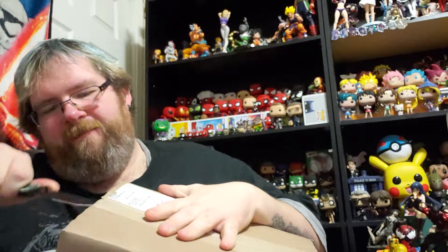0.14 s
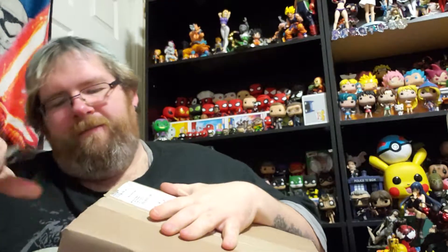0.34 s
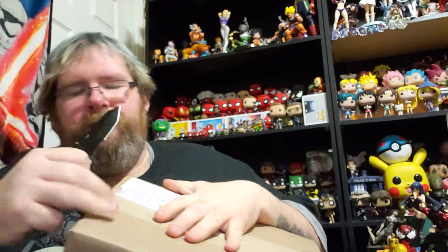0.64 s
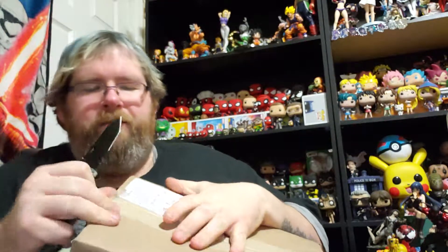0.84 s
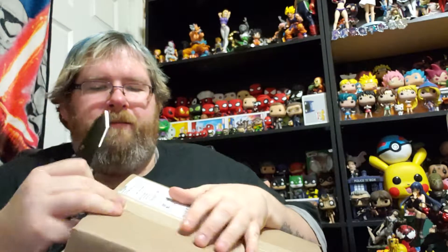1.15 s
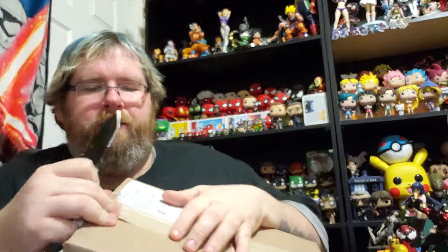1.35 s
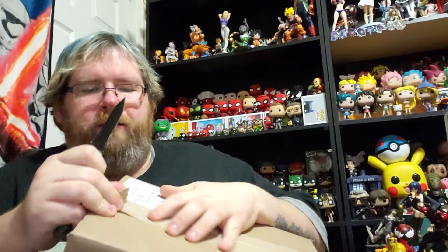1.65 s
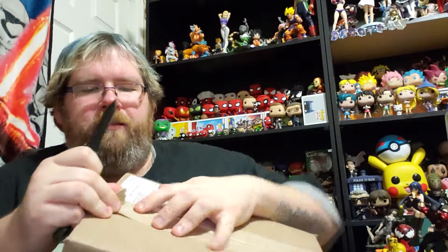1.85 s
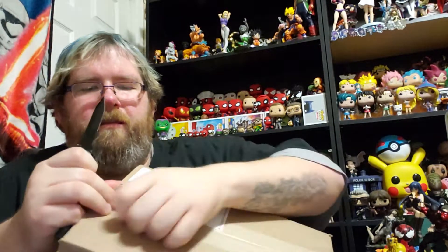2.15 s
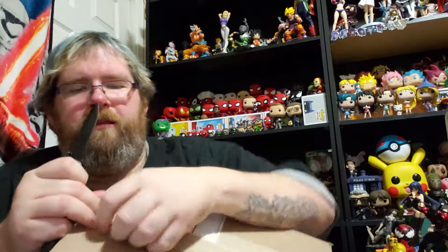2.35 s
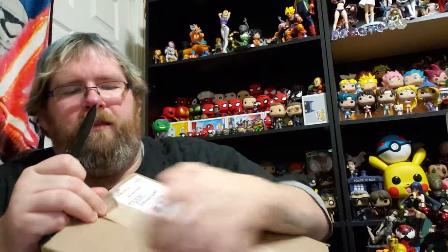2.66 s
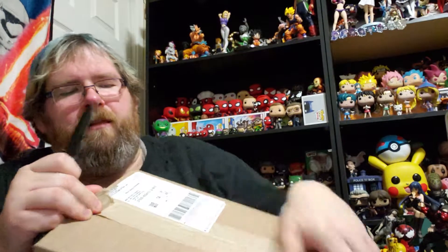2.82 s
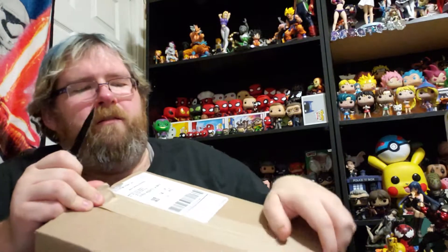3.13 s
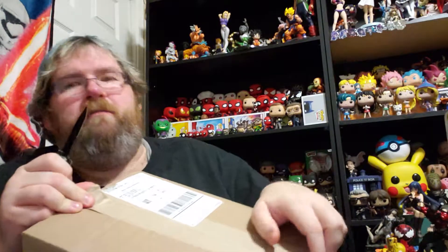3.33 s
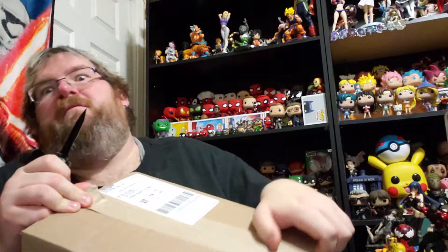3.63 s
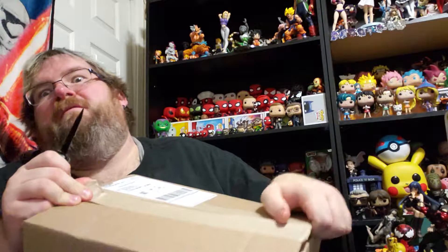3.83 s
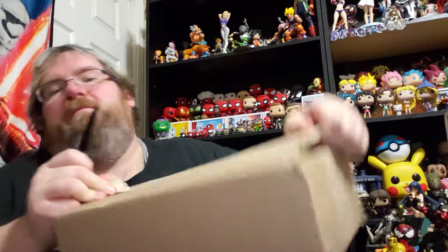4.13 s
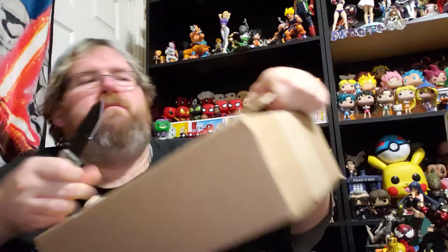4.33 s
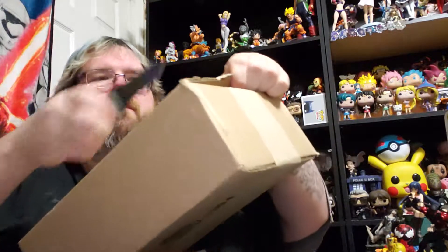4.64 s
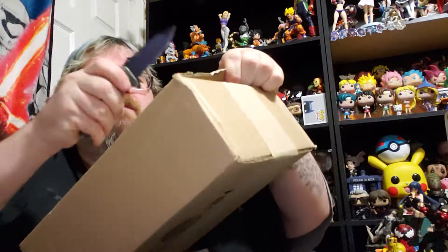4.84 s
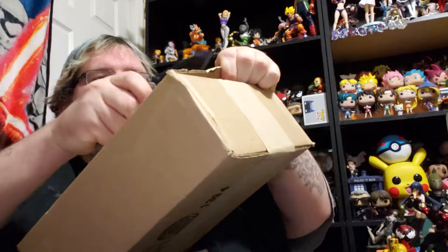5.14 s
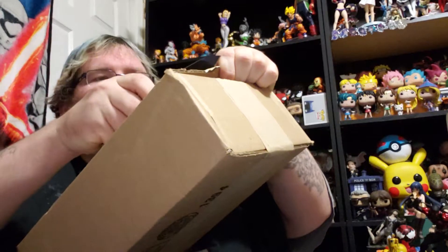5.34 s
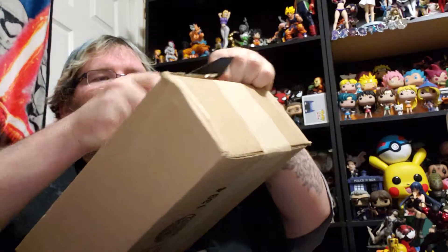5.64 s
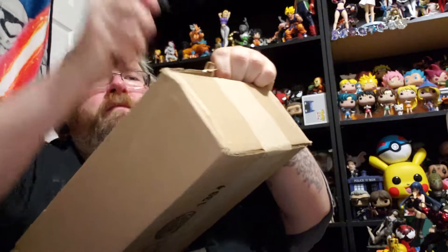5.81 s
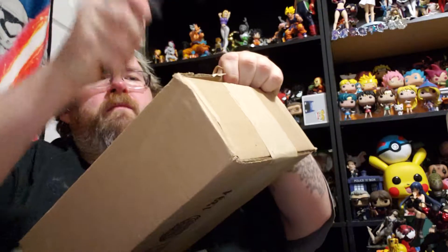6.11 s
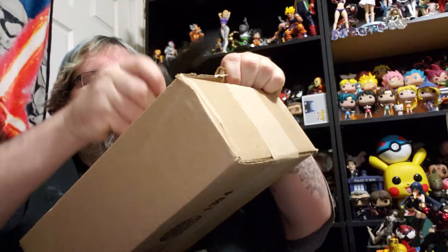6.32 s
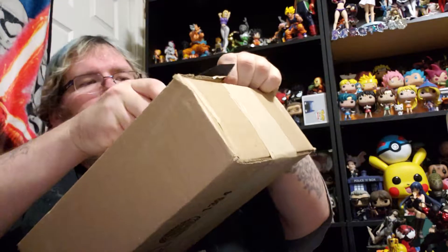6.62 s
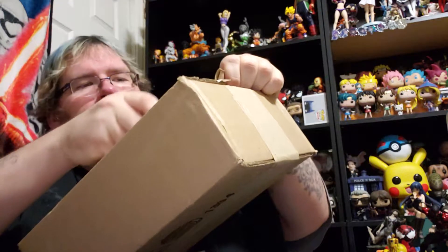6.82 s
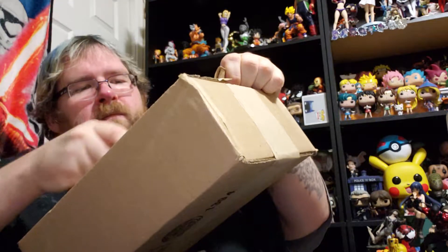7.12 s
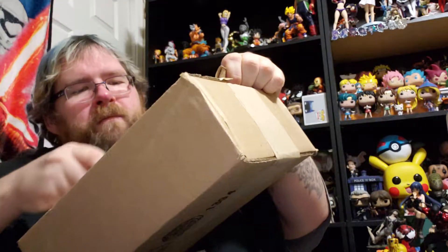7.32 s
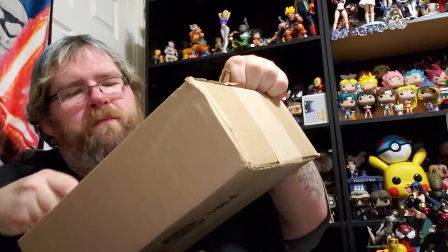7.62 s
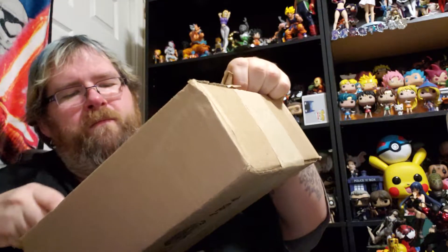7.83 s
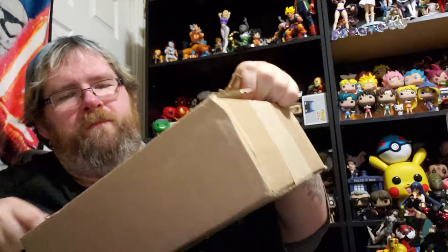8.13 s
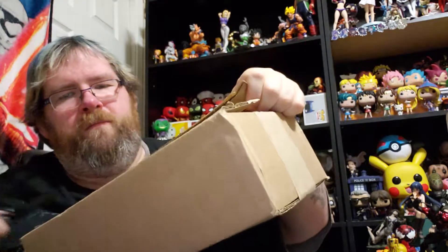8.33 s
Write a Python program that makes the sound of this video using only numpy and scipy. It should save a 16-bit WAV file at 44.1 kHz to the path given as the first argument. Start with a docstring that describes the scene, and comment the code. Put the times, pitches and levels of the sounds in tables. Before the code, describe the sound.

Close stereo microphones in a small furnished room with short dense echoes, a faint wavering low hum and soft hiss. At 0.2 s a light hollow tap on a cardboard box, then around 0.9-1.05 s a cluster of crisp knocks with papery scuffs. From 1.5 to 2.0 s small faint ticks and skin rubs. At 2.3 s duller pats, a sharper snappy knock at 2.7 s, low thumps near 3.0 s, with dry sliding rustle between and sparse ticks until 3.9 s. At 4.3-4.4 s the box is shifted with rubbing and a firm hollow thud. Near quiet follows until 5.7 s, when a loud punch pops through the tape. Quiet again, then small knocks at 6.6-6.8 s lead into a continuous gritty, rumbling blade scrape until 7.9 s. It ends with heavy boxy thumps at 7.94 and 8.09 s, then light bumps and rustle to 8.45 s.

```python
"""Hands and a knife work on a taped cardboard box, close to two microphone ports in a small furnished room.
Rubbing and slitting are stick-slip clicks and noise that shake box and panel modes; knocks ring the same
modes, and tape snaps are short noise bursts. Rasp and sizzle are friction noise of wandering colour.
Behind them: dense room echoes, a murmur, a wavering low hum and the hiss of each port."""
import sys
import numpy as np
from scipy import signal
from scipy.fft import rfft, irfft, next_fast_len
from scipy.io import wavfile

SR = 44100
rng = np.random.default_rng(int(sys.argv[2]) if len(sys.argv) > 2 else 0)


def bounce(signal):
    """Save signal as a 16-bit WAV file at the path given by the first command-line argument."""
    frames = np.transpose(np.atleast_2d(signal))
    limited = np.clip(frames, -1, 1)
    pcm = np.round(limited * 32767).astype(np.int16)
    wavfile.write(sys.argv[1], SR, pcm)


N = 373377

# All table levels are relative: the mix in scene() sets the final gains.
# knocks on the box: start_s, thump_db, thump_centre_hz, panel_db, panel_centre_hz, tape_snap_db
KNOCKS = [(0.213, -38, 250, -55, 622, -59), (0.2243, -25.5, 270, -31.5, 590, -38.5),
          (0.89, -41, 258, -37, 1900, -42), (0.9105, -26, 256.6, -24, 2010, -25.5),
          (0.935, -35, 250, -44.5, 651, -27.5), (0.985, -18.5, 581, -23, 580, -20),
          (0.997, -46, 566, -28, 590, -25), (1.048, -20, 297, -24.5, 690, -25.5),
          (1.49, -46, 245, -30.5, 1870, -28.5), (1.505, -30, 250, -36, 700, -31),
          (1.54, -42, 245, -40, 1870, -36), (1.567, -44, 468, -29, 1960, -25),
          (1.619, -34, 260, -38, 1860, -37), (1.679, -49, 382, -38, 1750, -38),
          (1.717, -40, 300, -44, 905, -45.5), (1.7495, -29, 280, -34, 645, -40),
          (1.784, -34, 280, -48, 650, -54), (1.805, -35, 280, -42, 640, -49),
          (1.909, -37, 300, -41, 653, -42.5), (1.925, -44, 400, -36, 1000, -52),
          (1.944, -32, 297, -35.5, 920, -56), (2.303, -25.5, 200, -41, 620, -58),
          (2.338, -22.5, 198, -33, 620, -44), (2.555, -26, 266.4, -52, 633, -68),
          (2.6733, -13, 271, -19, 1180, -11.5), (2.944, -18, 140, -34.5, 600, -36),
          (3.0204, -17.5, 161, -27.5, 616, -47), (3.035, -24, 174, -34, 627, -37),
          (3.103, -52, 258, -47, 767, -35), (3.469, -64, 517, -29, 1560, -27.5),
          (3.6291, -56, 598, -21.5, 786, -33), (3.719, -34.5, 240, -36, 678, -45.5),
          (3.8405, -38, 592, -32.5, 600, -30.5), (3.903, -25.5, 250, -42, 620, -62),
          (4.256, -43.5, 363, -34.5, 614, -45), (4.35, -17, 454, -25, 633, -34),
          (4.4008, -10, 227, -19.5, 617, -28), (4.537, -31.5, 220, -47.5, 620, -51),
          (4.561, -35, 202, -64.5, 620, -72), (5.323, -37.5, 180, -68, 596, -65.5),
          (5.489, -61.5, 127, -81, 708, -62), (5.587, -68.5, 131.7, -70, 593, -61),
          (5.644, -74, 201.4, -75, 595, -57.5), (5.707, 0.5, 445, -30, 600, -22),
          (5.749, -19, 248, -19.5, 850, -25.5), (6.53, -40.5, 250, -63, 617, -60),
          (6.572, -48, 366, -54, 2090, -34.5), (6.631, -28.5, 170, -58, 620, -56),
          (6.773, -22.5, 248, -30.5, 605, -34), (7.9358, 1, 297, -12, 726, -20),
          (7.9814, -36, 180, -19, 630, -15.5), (8.0862, -4.5, 494, -18, 636, -22.5),
          (8.28, -25, 261, -48, 608, -72), (8.35, -32.5, 226, -60, 600, -56),
          (8.436, -27.5, 260, -62, 607, -59)]
# rubs, grips and tears: full_strength_s, rise_s, hold_s, rumble_db, deep_over_rumble_db,
# panel_creak_db, card_rasp_db, tape_and_skin_sizzle_db
RUBS = [(0.0, 0.012, 0.0043, -45, -21, -53.5, -72, -48), (.3, 0.09, 0.0086, -53, -12, -48.5, -60, -47.5),
        (.66, 0.1, 0.14, -52.5, 4, -56.5, -60, -52.5), (.915, 0.034, 0.083, -36.5, -16, -38, -41, -38),
        (1.0, 0.024, 0.015, -50, 1, -51, -34.5, -32.5), (1.22, 0.085, 0.015, -58, 5, -51, -64, -47.5),
        (1.5, 0.15, 0.13, -50.5, -1, -60, -54, -49.5), (1.67, .05, 0.033, -65, -4, -68, -61, -45),
        (1.77, 0.18, 0.059, -48, -23, -57, -61.5, -51.5), (1.95, 0.031, 0.027, -47.5, -2, -55, -64, -67),
        (1.98, 0.082, 0.043, -89, 25, -53, -60.5, -48), (2.28, 0.36, 0.025, -47.5, 2, -44, -54.5, -42),
        (2.36, .06, 0.084, -52, -4, -32.5, -56, -46), (2.48, .025, .025, -48, -2, -38.5, -46, -34),
        (2.59, 0.038, 0.093, -37, 8.5, -42.5, -63, -50), (2.87, 0.45, 0.0051, -54.5, -3, -68, -54, -39.5),
        (2.99, 0.15, 0.031, -61.5, 6, -55, -50.5, -40.5), (3.13, 0.24, 0.019, -49, -12, -48.5, -52, -42.5),
        (3.25, 0.066, 0.03, -49, 1, -48.5, -55.5, -47.5), (3.49, 0.18, .005, -47.5, 2, -47.5, -58, -48.5),
        (3.77, 0.15, 0.0025, -45, 10, -49, -67, -57), (3.85, 0.027, 0.076, -39, -1.5, -50, -48.5, -47),
        (4.17, 0.14, 0.081, -59, 16, -50.5, -48.5, -46.5), (4.26, 0.17, 0.15, -36, -3, -48, -57.5, -58),
        (4.6, 0.036, 0.021, -55, -1, -83, -93, -75), (4.95, 0.39, 0.032, -56.5, 1.5, -87.5, -80.5, -76),
        (5.4, 0.06, 0.027, -57, -6.5, -91, -99, -85), (5.68, .06, 0.016, -67.5, -1.5, -74, -85, -59.5),
        (5.712, 0.0066, 0.016, -17.5, 5.5, -30, -28.5, -24.5),
        (5.96, 0.093, 0.021, -60.5, -5.5, -65.5, -86, -78), (6.29, 0.3, 0.031, -63.5, -6, -90, -90, -85),
        (6.57, 0.038, 0.036, -49.5, 7, -59.5, -50.5, -52.5),
        (6.62, 0.048, 0.021, -43.5, 8.5, -57, -51, -38.5),
        (8.0, .015, 0.073, -34.5, 9.5, -44, -43.5, -42.5), (8.18, 0.09, 0.022, -62, -5, -46.5, -58, -51),
        (8.29, 0.096, 0.0021, -41.5, -5, -54, -62.5, -53),
        (8.44, 0.039, 0.0044, -47.5, -8, -52.5, -83, -74)]
# long draw of the blade along the seam: time_s, rumble_db, panel_creak_db, friction_db
CUT = [(6.74, -51, -95, -69), (6.78, -33.5, -52, -40.5), (6.86, -33.5, -44.5, -44),
       (7.05, -30.5, -40, -42.5), (7.16, -34.5, -43, -47), (7.42, -31.5, -37, -44),
       (7.59, -36.5, -42.5, -45), (7.91, -36, -42, -43), (7.95, -70, -64, -46)]
# hands resting and creeping on the box: time_s, rumble_db, panel_creak_db, friction_db
HOLD = [(0.0, -75, -82, -65), (0.42, -61.5, -73.5, -66), (0.6, -53, -61, -57), (1.1, -55.5, -64, -57.5),
        (1.34, -64, -60.5, -55), (1.6, -49.5, -90.5, -52.5), (2.12, -86, -76.5, -57), (2.75, -64, -48, -78),
        (3.2, -67, -72, -55.5), (3.55, -57, -58, -53), (4.0, -50, -50, -52.5), (4.45, -69, -63, -54.5),
        (4.68, -82, -78, -72), (5.2, -83, -84.5, -78), (5.6, -78.5, -85, -76.5), (6.1, -86, -96, -87.5),
        (6.7, -80.5, -89.5, -81.5), (8.47, -70, -74, -76)]
# modes of the hollow box, undamped by a hand: pitch_hz, level_db, t60_s
BOX_MODES = [(122.3, -3.5, 0.06), (172, -2, 0.073), (244.8, 1.5, 0.081), (282.7, -1.5, 0.059),
             (364.7, -1, 0.06), (438.3, -1, 0.071), (526, 2, 0.027)]
# modes of the card panels, undamped by a hand: pitch_hz, level_db, t60_s
PANEL_MODES = [(626, 1, 0.021), (825, 0.5, 0.018), (876, 1.5, 0.016), (1160, 2, 0.0064), (1596, -2, 0.0079),
               (1950, -11, 0.016)]
# spectrum of the card rasp: frequency_hz, density_db
RASP_SPECTRUM = [(1200, -7.5), (1800, 1), (2400, -4.5), (3500, -4), (5000, -6.5), (6500, -6), (9000, -33)]
# spectrum of the tape and skin sizzle: frequency_hz, density_db
SIZZLE_SPECTRUM = [(3000, -20), (4500, -8.5), (6000, -0.5), (8000, 2), (12000, -3.5), (16000, -6.5)]
# edges of the friction bands that swell and sink: frequency_hz
SHIFT_EDGES_HZ = [900, 1500, 2300, 3400, 5000, 8000, 17000]
# spectrum of the room murmur: frequency_hz, density_db
MURMUR_SPECTRUM = [(15, -54), (25, -10), (38, -10), (91, 7), (112, -9.5), (162, -5.5), (204, -13.5),
                   (289, -12), (578, -14), (662, -25.5), (715, -39), (818, -26), (900, -32.5),
                   (1320, -33.5), (2500, -31), (3250, -67.5), (5500, -120)]
# port resonances and dips, left list then right: centre_hz, width_hz, gain_db
PORTS = [
    [(7520, 3240, 6.5), (8990, 2300, -16), (13800, 5900, -15)],
    [(5000, 3900, -3.5), (8180, 1240, -17.5), (11450, 5300, 15)],
]
# hiss of each port, left then right: low_hz, high_hz, band_db, broadband_db
SELF_NOISE = [(6100, 7700, -71.5, -78), (9400, 21000, -95.5, -84)]

SWING_DB = 20  # span of one rise or release
RELEASE_S, RELEASE_PER_RISE = 0.021, 0.2  # slow gestures also let go slowly
HOLD_DEEP_OVER_RUMBLE_DB, CUT_DEEP_OVER_RUMBLE_DB = 3.5, 2.5
HOLD_RASP_DB, CUT_RASP_DB = -9, -7  # over the dB mean of creak and friction
# rattle around a knock: rumble re thump, creak re panel, rasp and sizzle re snap
RATTLE_RUMBLE_DB, RATTLE_CREAK_DB, RATTLE_RASP_DB, RATTLE_SIZZLE_DB = -15, -11, -19, -14.5
RATTLE_RISE_S, RATTLE_HOLD_S = 0.013, 0.009  # a scuff leads into the blow
RATTLE_DEEP_HZ, RATTLE_DEEP_DB_PER_OCTAVE = 256, 17.5  # low thumps rattle the deep modes
DEEP_HZ = 205  # modes below this are deep
HAND_DAMPING = 0.79  # a knocking hand shortens t60 to this share
BOX_LOW_CUT_HZ = 105  # the box radiates little below its lowest mode
FLICKER_DB, FLICKER_HZ = 0.5, 40
FIBRE_DB, FIBRE_HZ = 2, 400  # fine grain of tearing fibres
SHIFT_DB, SHIFT_HZ = 2.5, 7  # colour wanders as the contact moves
LEFT_LAG_S = 0.00009
ROOM_T60_S, ROOM_DB, WALL_CUT_HZ, APART_HZ = 0.26, -7, 18000, 600
MURMUR_DB, MURMUR_WANDER_DB, MURMUR_WANDER_HZ = -72, 1.8, 5.1
HUM_HZ, HUM_WIDTH_HZ, HUM_DB = 70, 14, -69.5
BASS_CUT_HZ, TOP_CUT_HZ = 38, 15800


def handling():
    """Contact force over time: dB levels of rumble, deep modes over rumble, creak, rasp and sizzle."""
    s, thump_db, thump_hz, panel_db, _, snap_db = np.transpose(KNOCKS)
    rattles = np.transpose([
        s,
        np.full(len(s), RATTLE_RISE_S),
        np.full(len(s), RATTLE_HOLD_S),
        thump_db + RATTLE_RUMBLE_DB,
        RATTLE_DEEP_DB_PER_OCTAVE * np.log2(RATTLE_DEEP_HZ / thump_hz),
        panel_db + RATTLE_CREAK_DB,
        snap_db + RATTLE_RASP_DB,
        snap_db + RATTLE_SIZZLE_DB])
    rows = np.vstack([RUBS, rattles])
    rows[:, 4] += rows[:, 3]  # deep level from relative to absolute, so powers add
    power = gestures(rows)
    power += steady(HOLD, HOLD_DEEP_OVER_RUMBLE_DB, HOLD_RASP_DB)
    power += steady(CUT, CUT_DEEP_OVER_RUMBLE_DB, CUT_RASP_DB)
    rumble_db, deep_db, creak_db, rasp_db, sizzle_db = 10 * np.log10(power)
    return rumble_db, deep_db - rumble_db, creak_db, rasp_db, sizzle_db


def gestures(rows):
    """Passing contacts: each rises, holds and lets go along dB ramps; powers add in every layer."""
    t = np.arange(0, N / SR + 0.002, 0.001)
    s, rise_s, hold_s = rows[:, :3].T[..., None]
    release_s = RELEASE_S + RELEASE_PER_RISE * rise_s
    before = np.maximum(s - t, 0) / rise_s
    after = np.maximum(t - s - hold_s, 0) / release_s
    shape_db = np.maximum(-SWING_DB * (before + after), -100)
    power = from_db(2 * rows[:, 3:].T) @ from_db(2 * shape_db)
    return np.array([np.interp(np.arange(N) / SR, t, p) for p in power])


def steady(curve, deep_over_rumble_db, rasp_offset_db):
    """Lasting contact: power of every layer, interpolated in dB between the points of a curve."""
    t = np.arange(N) / SR
    s, *levels = np.transpose(curve)
    rumble_db, creak_db, friction_db = [np.interp(t, s, c, left=-150, right=-150) for c in levels]
    deep_db = rumble_db + deep_over_rumble_db
    rasp_db = (creak_db + friction_db) / 2 + rasp_offset_db
    return from_db(2 * np.array([rumble_db, deep_db, creak_db, rasp_db, friction_db]))


def shaken(modes, level_db, deep_db, per_s, spread_db):
    """Slips shake every mode of a body; a separate gain drives the deep modes."""
    force = from_db(level_db) * slips(per_s, spread_db)
    deep_force = force * from_db(deep_db)
    ring_power = sum(from_db(2 * db) * t60_s for hz, db, t60_s in modes) * SR / (4 * np.log(1000))
    out = np.zeros(N)
    for k, (hz, db, t60_s) in enumerate(modes):
        drive = deep_force if hz < DEEP_HZ else force
        out += (-1) ** k * from_db(db) * ring(drive, hz, t60_s)  # neighbours in opposite phase
    return out / np.sqrt(ring_power)


def slips(per_s, spread_db):
    """Stick-slip: random clicks of uneven size over a bed of fine friction noise."""
    sizes = from_db(spread_db * np.minimum(rng.exponential(1, N), 4))
    clicks = sizes * (rng.random(N) < per_s / SR)
    return rms_one(clicks) + 0.5 * rng.standard_normal(N)


def struck(modes, strength_db, centre_hz, db_per_octave, contact_hz):
    """A knock favours the modes near its centre; the soft contact rounds the blow."""
    at, out = knock_samples(), np.zeros(N)
    scatter_db = 2 * rng.standard_normal((len(at), len(modes)))
    for k, (hz, db, t60_s) in enumerate(modes):
        off_centre_db = db_per_octave * np.abs(np.log2(hz / centre_hz))
        clicks = np.zeros(N)
        clicks[at] = from_db(strength_db + db + scatter_db[:, k] - off_centre_db)
        out += ring(clicks, hz, t60_s * HAND_DAMPING)
    return signal.lfilter(*signal.butter(2, contact_hz, fs=SR), out)


def crackle(spectrum, friction_db, snap_db, snap_t60_s):
    """Friction noise, unrelated at the two ports; each snap adds a burst that decays exponentially."""
    bursts = np.zeros(N)
    bursts[knock_samples()] = from_db(snap_db)
    decay = from_db(-60 / (snap_t60_s * SR))
    bursts = signal.lfilter([1], [1, -decay], bursts + 1e-18)
    grain_db = FLICKER_DB * drift(FLICKER_HZ) + FIBRE_DB * drift(FIBRE_HZ)
    level = from_db(friction_db + grain_db) + bursts
    return level * shifting(coloured(rng.standard_normal((2, N)), spectrum))


def shifting(x):
    """Moving contact: each band of the friction swells and sinks on its own."""
    out = np.zeros_like(x)
    for k, edges_hz in enumerate(zip(SHIFT_EDGES_HZ, SHIFT_EDGES_HZ[1:])):
        sos = signal.butter(2, edges_hz, "band", fs=SR, output="sos")
        swell = from_db(SHIFT_DB * drift(SHIFT_HZ))
        out += (-1) ** k * swell * signal.sosfilt(sos, x)
    return out


def room(x):
    """Dense echoes that die away, alike at both ports in the bass and less related above."""
    t = np.arange(int(0.5 * SR)) / SR
    mid, side = rng.standard_normal((2, len(t)))
    side = signal.lfilter(*signal.butter(1, APART_HZ, "high", fs=SR), side)
    fade = from_db(-60 * t / ROOM_T60_S) * np.clip(t / 0.01, 0, 1)  # 10 ms build-up
    tail = (mid + side * [[1], [-1]]) * fade
    tail = signal.lfilter(*signal.butter(1, WALL_CUT_HZ, fs=SR), tail)
    tail /= np.sqrt(np.sum(tail ** 2) / 2)
    return signal.fftconvolve(x, tail, axes=1)[:, :N]


def murmur():
    """Room murmur: coloured noise, mostly common to both ports, of slowly wandering level."""
    mid, side = rng.standard_normal((2, N))
    level = from_db(MURMUR_DB + MURMUR_WANDER_DB * drift(MURMUR_WANDER_HZ))
    return level * coloured(mid + 0.31 * side * [[1], [-1]], MURMUR_SPECTRUM)


def hum():
    """Low hum that wavers: noise through one narrow resonance."""
    t60_s = np.log(1000) / (np.pi * HUM_WIDTH_HZ)
    return from_db(HUM_DB) * rms_one(ring(rng.standard_normal(N), HUM_HZ, t60_s))


def from_db(db):
    """Decibels to gain."""
    return 10 ** (np.asarray(db) / 20)


def rms_one(x):
    """Scales to unit rms."""
    return x / np.sqrt(np.mean(x ** 2) + 1e-20)


def knock_samples():
    """Sample index of each knock."""
    return (np.array(KNOCKS)[:, 0] * SR).astype(int)


def coloured(x, spectrum):
    """Noise shaped by a (frequency_hz, density_db) spectrum; rms 1."""
    size = next_fast_len(N)
    hz, db = np.transpose(spectrum)
    bins_hz = np.fft.rfftfreq(size, 1 / SR)
    gain = from_db(np.interp(np.log(bins_hz + 1), np.log(hz), db, left=-90))
    return rms_one(irfft(rfft(x, size) * gain, size)[..., :N])


def drift(rate_hz):
    """Random wander of unit rms: noise through a two-pole low-pass."""
    r = np.exp(-2 * np.pi * rate_hz / SR)
    settle = 9000  # samples dropped while the filter settles
    wander = signal.lfilter([1], [1, -2 * r, r * r], rng.standard_normal(N + settle))
    return rms_one(wander[settle:])


def ring(clicks, hz, t60_s):
    """Damped resonator: a unit click starts a decaying sine of height about 1."""
    r, w = from_db(-60 / (t60_s * SR)), 2 * np.pi * hz / SR
    return signal.lfilter([0, np.sin(w)], [1, -2 * r * np.cos(w), r * r], clicks + 1e-18)


def bell(x, hz, width_hz, db):
    """One resonant peak or dip."""
    g, w = from_db(db / 2), 2 * np.pi * hz / SR
    a = np.tan(np.pi * width_hz / SR)
    zeros = [1 + a * g, -2 * np.cos(w), 1 - a * g]
    poles = [1 + a / g, -2 * np.cos(w), 1 - a / g]
    return signal.lfilter(zeros, poles, x)


def lean_left(x, db):
    """Raises the left port and lowers the right by the same dB."""
    return x * from_db([[db], [-db]])


def scene():
    """Box, card and tape, their echoes, murmur and hum."""
    rumble_db, deep_db, creak_db, rasp_db, sizzle_db = handling()
    _, thump_db, thump_hz, panel_db, panel_hz, snap_db = np.transpose(KNOCKS)
    body = shaken(BOX_MODES, rumble_db - 4, deep_db, per_s=120, spread_db=2.5)
    body += struck(BOX_MODES, thump_db - 11.5, thump_hz, db_per_octave=11, contact_hz=710)
    body = signal.lfilter(*signal.butter(2, BOX_LOW_CUT_HZ, "high", fs=SR), body)
    card = shaken(PANEL_MODES, creak_db - 2.5, 0, per_s=500, spread_db=2.5)
    card += struck(PANEL_MODES, panel_db - 2, panel_hz, db_per_octave=24.5, contact_hz=2433)
    rasp = crackle(RASP_SPECTRUM, rasp_db - 2, snap_db - 15.5, snap_t60_s=0.038)
    sizzle = crackle(SIZZLE_SPECTRUM, sizzle_db - 6, snap_db + 2.5, snap_t60_s=0.0027)
    near = lean_left(body, 0.8) + lean_left(card, 1.5) + lean_left(rasp + sizzle, 2.2)
    n = np.arange(N)
    near[0] = np.interp(n - round(LEFT_LAG_S * SR), n, near[0])
    return near + from_db(ROOM_DB) * room(near) + murmur() + hum()


def record(dry):
    """Each port adds its resonances and hiss; bass and top are cut."""
    out = signal.lfilter(*signal.butter(2, BASS_CUT_HZ, "high", fs=SR), dry)
    for k, (low_hz, high_hz, band_db, broadband_db) in enumerate(SELF_NOISE):
        for hz, width_hz, db in PORTS[k]:
            out[k] = bell(out[k], hz, width_hz, db)
        white = rng.standard_normal(N)
        sos = signal.butter(3, [low_hz, high_hz], "band", fs=SR, output="sos")
        band = rms_one(signal.sosfilt(sos, white))
        out[k] += from_db(band_db) * band + from_db(broadband_db) * white
    top_cut = signal.ellip(12, 0.5, 80, TOP_CUT_HZ, fs=SR, output="sos")
    return signal.sosfilt(top_cut, out)


dry = scene()
out = record(dry)
bounce(out)
```